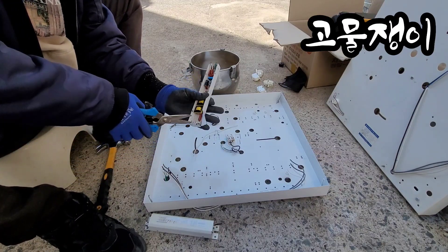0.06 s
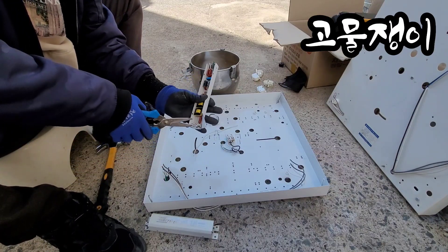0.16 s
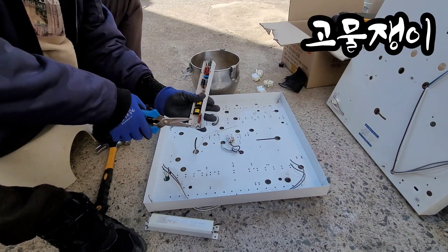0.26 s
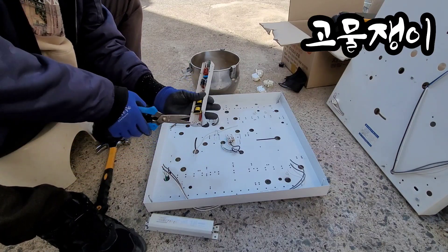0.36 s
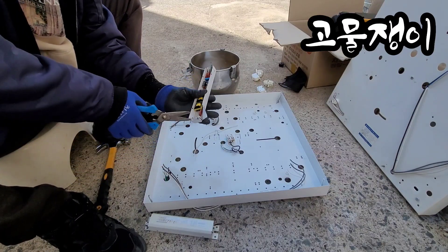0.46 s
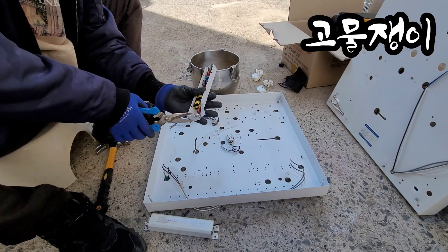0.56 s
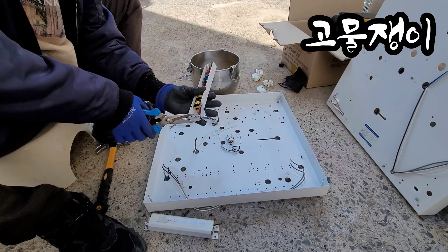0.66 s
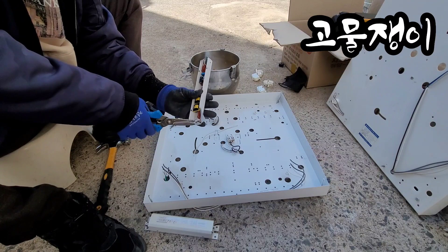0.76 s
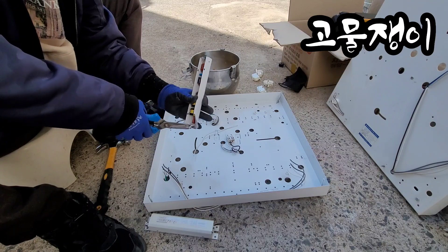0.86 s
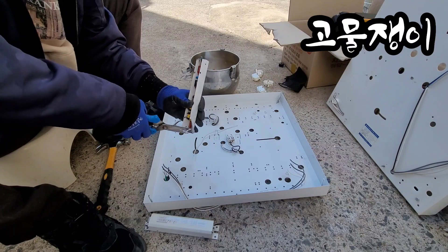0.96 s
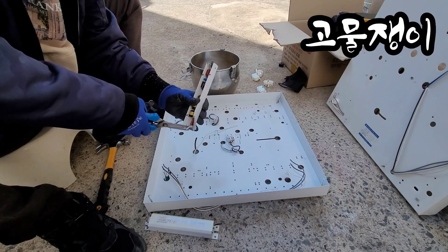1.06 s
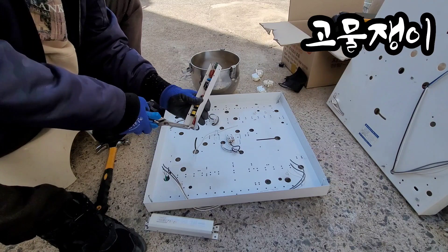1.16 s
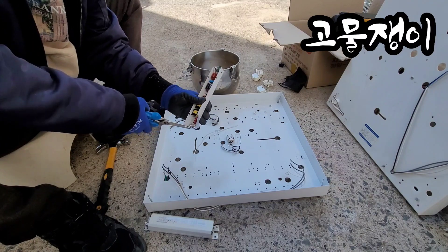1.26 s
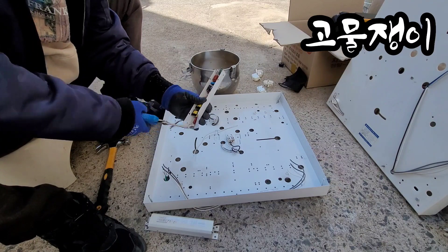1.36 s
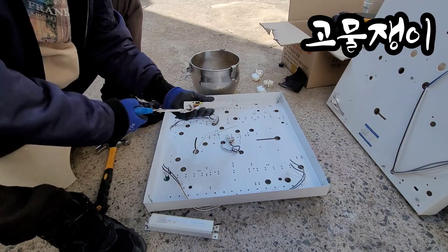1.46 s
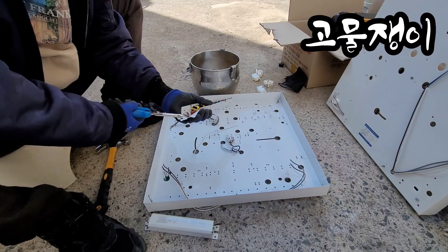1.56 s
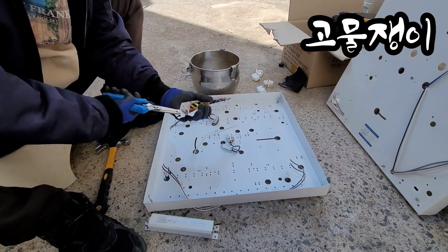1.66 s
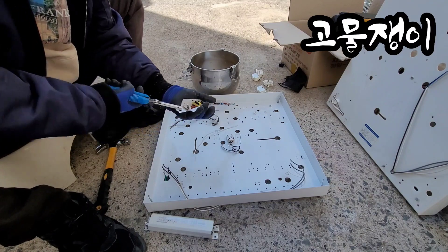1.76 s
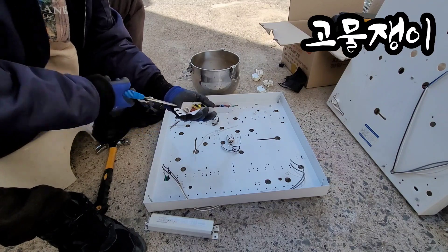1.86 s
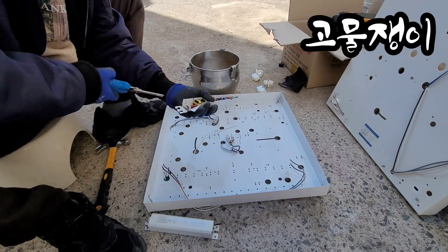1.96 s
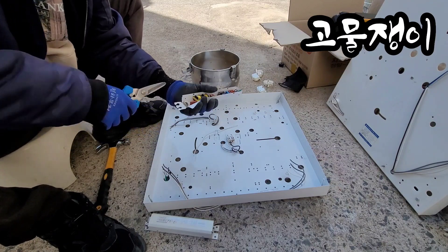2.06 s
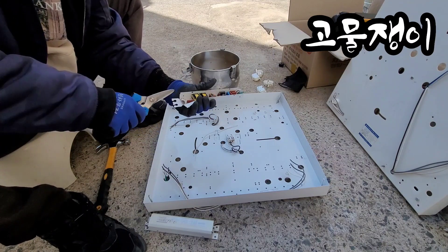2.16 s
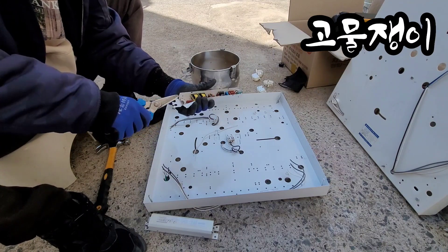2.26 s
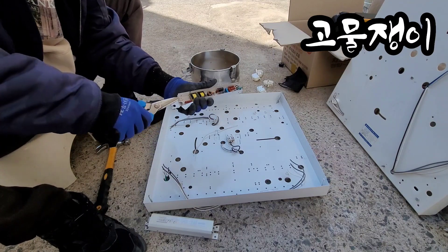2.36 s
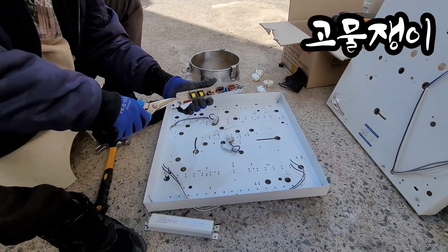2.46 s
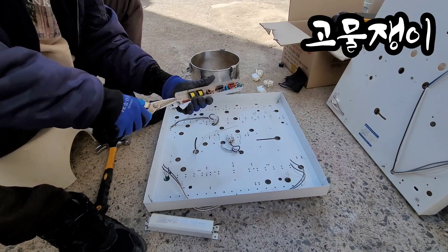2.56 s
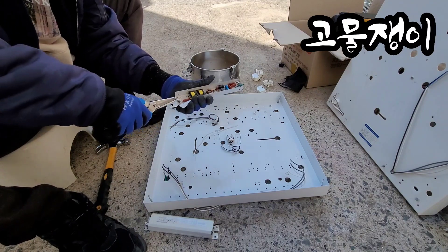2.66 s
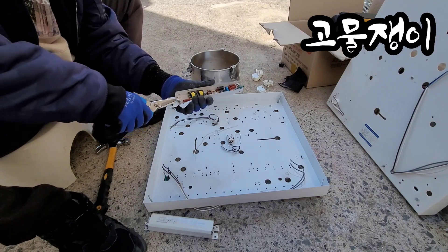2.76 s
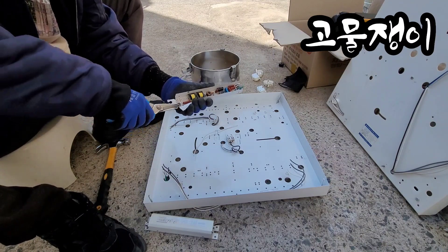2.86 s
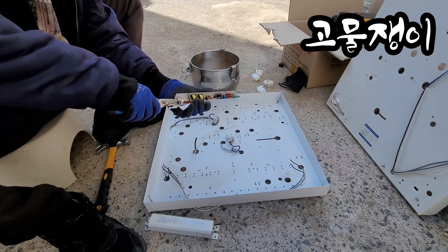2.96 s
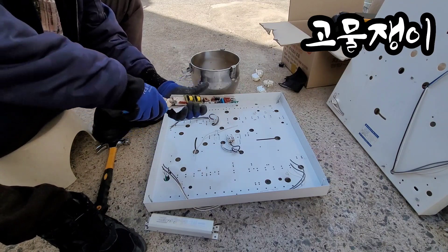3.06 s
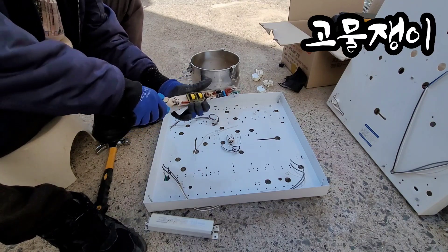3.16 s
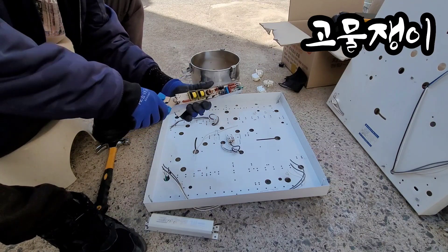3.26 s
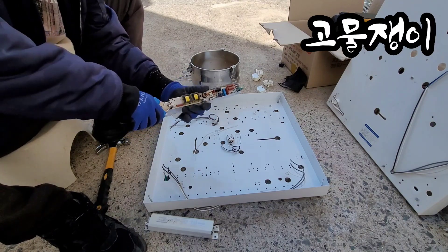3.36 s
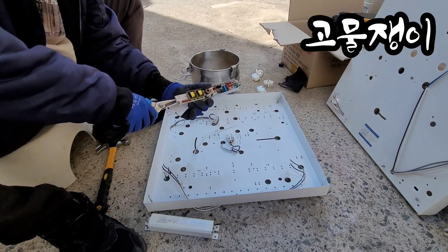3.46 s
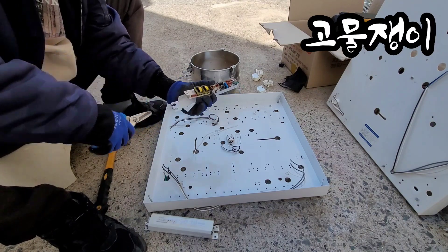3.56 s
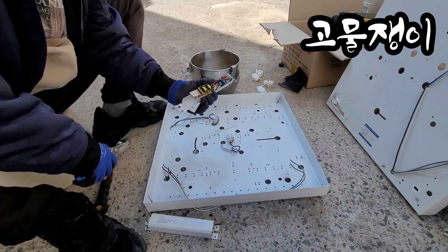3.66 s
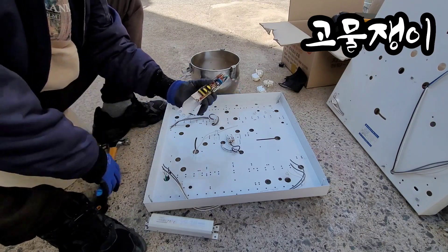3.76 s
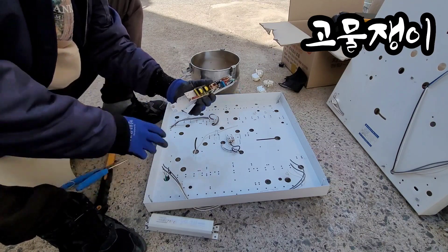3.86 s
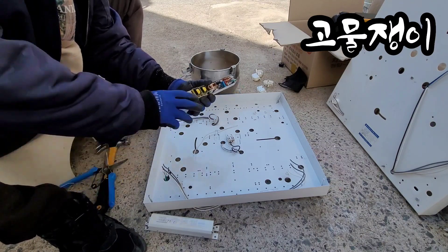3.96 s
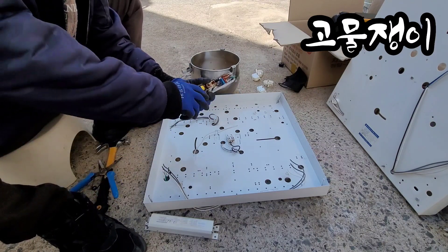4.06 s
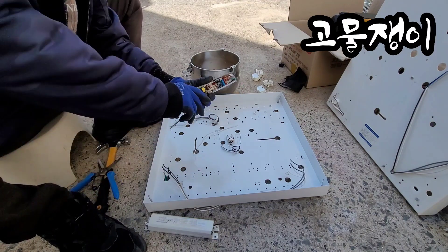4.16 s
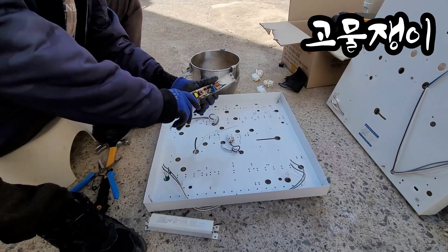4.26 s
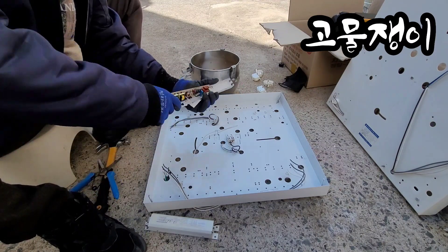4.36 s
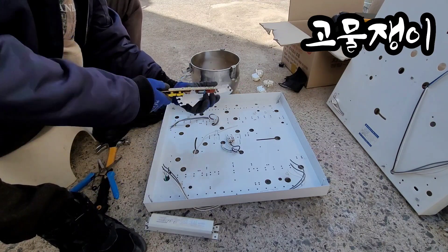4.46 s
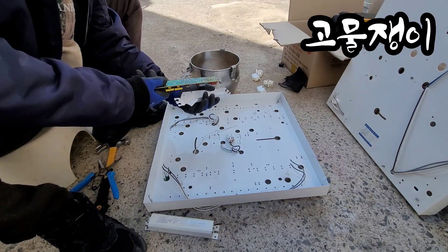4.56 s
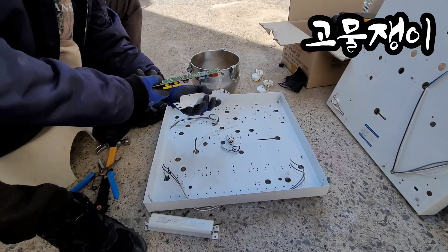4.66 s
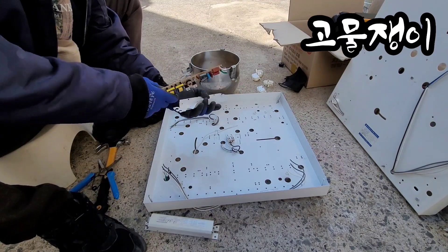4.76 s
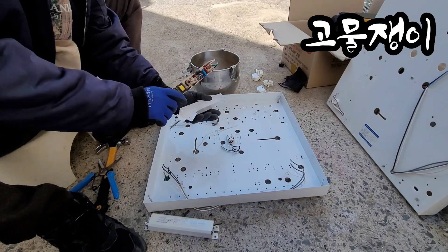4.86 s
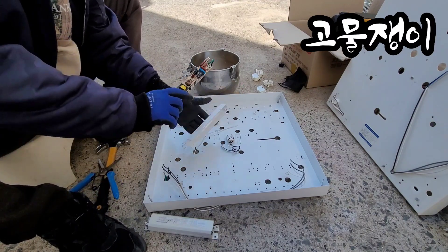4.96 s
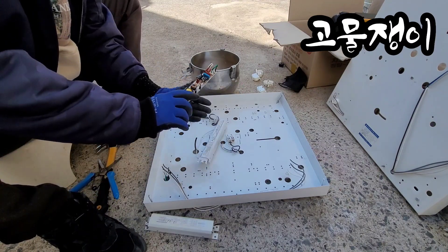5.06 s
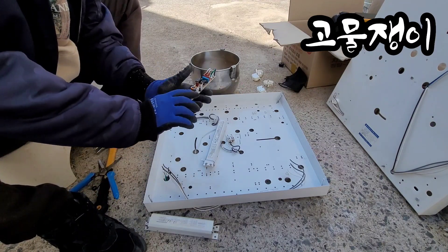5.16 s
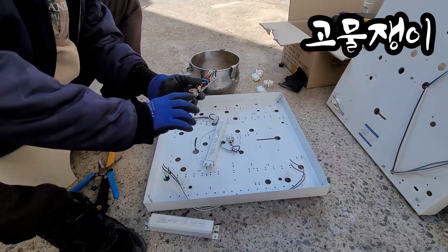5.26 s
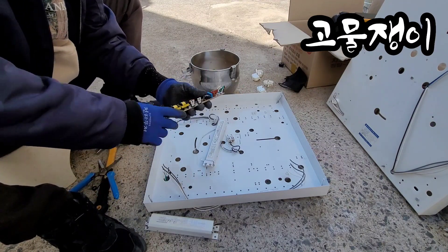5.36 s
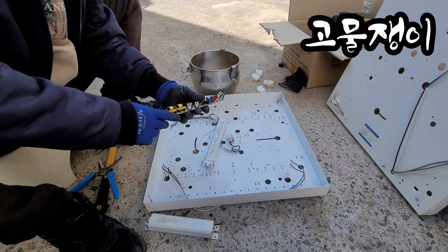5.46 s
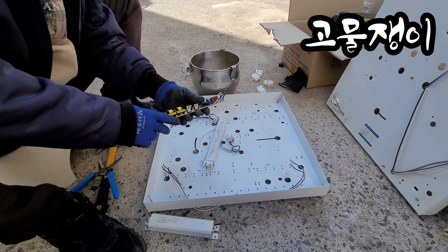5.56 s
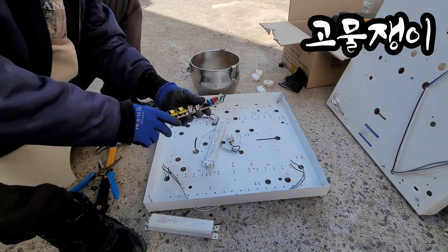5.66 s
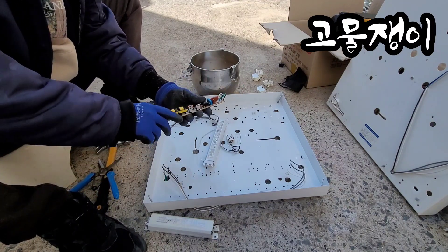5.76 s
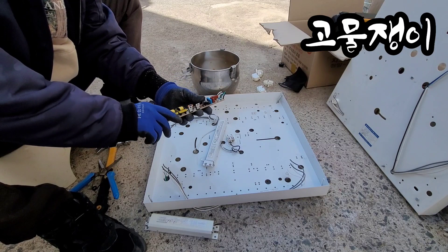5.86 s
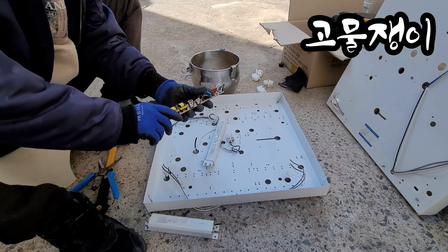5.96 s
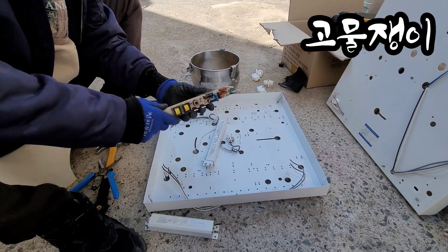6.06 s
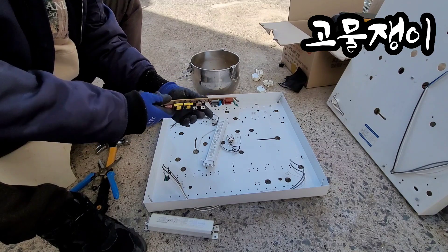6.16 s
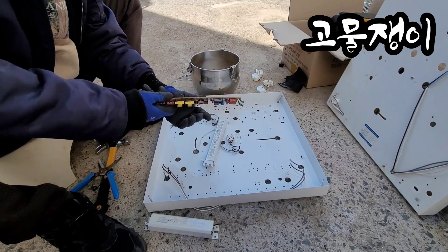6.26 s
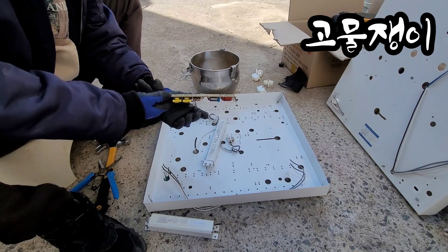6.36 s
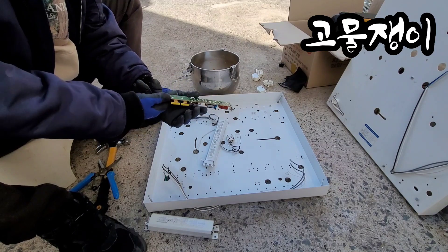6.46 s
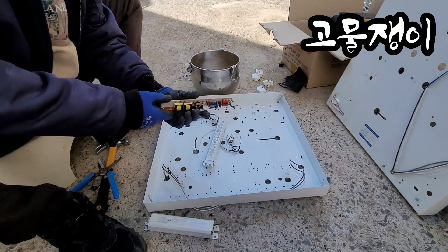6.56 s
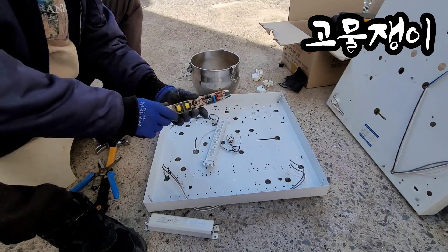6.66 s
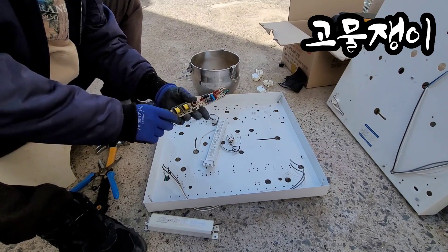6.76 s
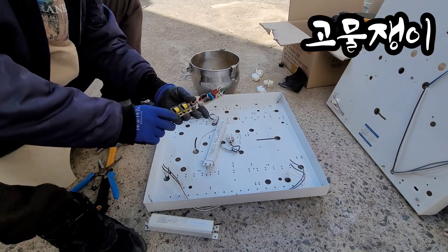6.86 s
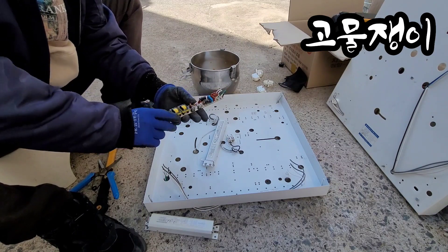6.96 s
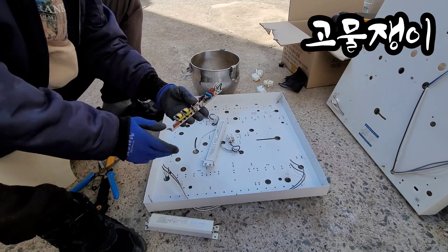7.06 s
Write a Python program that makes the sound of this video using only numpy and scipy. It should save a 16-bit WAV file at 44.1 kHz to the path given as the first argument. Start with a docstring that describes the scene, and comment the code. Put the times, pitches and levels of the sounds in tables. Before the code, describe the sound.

Close stereo sound of gloved hands taking apart a light fixture on outdoor concrete. Distant traffic rumbles softly with a faint low engine drone. From 0 to 1.3 seconds there are sparse, light board ticks and small steel clicks. At about 1.6 the cutters bite and snap sharply through a wire, with a brief steely ring. Clicks at 2.0 and 2.3 lead to denser prying taps, scrapes and tiny rubber squeaks from 2.9 to 3.5. Three quick steel clicks come near 3.7. From 3.9 to 4.3 the cutters go down on grit: bright cracks, two clacks and short ringing thuds, followed by a small scrape, squeak and taps around 4.4. At 5.05 a cover comes loose faintly, then from 5.2 it bounces rapidly in the sheet-metal tray, a loud bright crash settling by 5.5 with ringing that fades by about 6. Quiet background and barely audible clicks remain until 7.1.

```python
"""Cutting a wire on concrete

Outdoors, close to two microphones, gloved hands work on a light fixture's circuit board with wire cutters.
The board ticks (noise bursts through resonances), gloves squeak (rough tones), steel scrapes (grains of noise).
The cutters snap through once, pry, and are put down on gritty ground: cracks, a clack and a ringing thud.
Then the board's plastic cover bounces in the sheet-metal tray, setting clear and dense modes ringing.
Ground and walls throw the work back; far off, traffic rumbles (filtered noise) and an engine drones (a sine)."""
import sys
import numpy as np
from scipy import signal
from scipy.fft import rfft, irfft
from scipy.io import wavfile
from scipy.ndimage import uniform_filter1d

SR = 44100
rng = np.random.default_rng(int(sys.argv[2]) if len(sys.argv) > 2 else 0)


def generate_wav(sig):
    """Save sig (samples, or channels by samples) to the path in sys.argv[1] as 16-bit PCM at SR."""
    pcm = np.round(np.clip(np.atleast_2d(sig).T, -1, 1) * 32767).astype(np.int16)
    wavfile.write(sys.argv[1], SR, pcm)


N = 314424


def amp(db):
    """Decibels to gain."""
    return 10 ** (np.asarray(db) / 20)


def at_hz(points, hz):
    """Read a table on a log-frequency axis."""
    points = np.array(points)
    return np.interp(np.log(hz + 1e-3), np.log(points[:, 0]), points[:, 1])


def in_time(rows):
    """Read a curve at every sample."""
    return np.interp(np.arange(N) / SR, *np.transpose(rows))


def through(x, response):
    """Play x through an impulse response, channel by channel."""
    return signal.fftconvolve(np.atleast_2d(x), np.atleast_2d(response), axes=1)[:, :N]


def coloured(x, spectrum, size=8192):
    """Causal (minimum-phase) filter with the given spectrum; white noise keeps its power."""
    cepstrum = irfft(np.log(amp(at_hz(spectrum, np.fft.rfftfreq(size, 1 / SR)))))
    # folding the cepstrum onto positive time makes the filter causal
    cepstrum[1:size // 2] *= 2
    cepstrum[size // 2 + 1:] = 0
    response = irfft(np.exp(rfft(cepstrum)))
    return through(x, response / np.linalg.norm(response))


def high_pass(x, hz, order=2):
    """Small objects radiate little bass."""
    return signal.sosfilt(signal.butter(order, hz, "high", fs=SR, output="sos"), x)


def add(track, s, sound):
    """Mix a sound into a track at time s."""
    start = max(round(s * SR), 0)
    track[:, start:start + sound.shape[-1]] += sound[..., :N - start]


def fading(t60, size):
    """Exponential decay from 1, falling 60 dB in t60 seconds."""
    return np.exp(-np.log(1000) * np.arange(size) / SR / max(t60, 1e-3))


def burst(t60, rise_s, size=8000):
    """A contact: a swarm of tiny fractures and reflections, different at each microphone."""
    noise = rng.standard_normal((2, size))
    return noise * fading(t60, size) * (1 - fading(rise_s, size))


def resonance(force, modes, size=2048):
    """Damped resonances (Hz, width Hz, dB) in parallel; white noise keeps its power."""
    t = np.arange(size) / SR
    response = np.zeros(size)
    for k, (hz, width, db) in enumerate(modes):
        sign = (-1) ** k   # neighbours ring in opposite phase
        decay = np.exp(-np.pi * width * t)
        response += sign * amp(db) * width * decay * np.cos(2 * np.pi * hz * t)
    return through(force, response / np.linalg.norm(response))


def ringing(modes, spread_db, lag_s, size=36000):
    """One blow on a set of modes, each with a fresh strength and its own lag between the microphones."""
    t, out = np.arange(size) / SR, np.zeros((2, size))
    for hz, db, t60 in modes:
        strength, late = rng.standard_normal(2)   # chance strength and direction
        lag = np.array([[0], [lag_s * (1 + late / 4)]])
        tone = np.sin(2 * np.pi * hz * np.maximum(t - lag, 0))
        out += amp(db + spread_db * strength) * fading(t60, size) * tone
    return out


def dense_ring(t60s, size=36000, count=10):
    """Countless overlapping modes: noise that dies band by band; unit energy."""
    out, edges = 0, np.geomspace(100, 18000, count)
    for low, high in zip(edges, edges[1:]):
        band_pass = signal.butter(2, [low, high], "band", fs=SR, output="sos")
        band = signal.sosfilt(band_pass, rng.standard_normal((2, size)))
        out = out + band * fading(at_hz(t60s, np.sqrt(low * high)), size)
    return out / np.sqrt(np.sum(out ** 2) / 2)


# spectrum of the far traffic: f/Hz, relative level/dB
STREET_SPECTRUM = [(15, -29.5), (25, -15.5), (50, -2.5), (88, 0.5), (125, -4), (170, -12.5), (240, -23),
                   (400, -26.5), (680, -27), (800, -30.5), (1200, -43), (2000, -40.5), (4000, -53)]
# swell of the far rumble, before the trims of its two parts: t/s, level/dB
TRAFFIC_SWELL = [(0, -43.5), (.8, -45.5), (1.5, -50.5), (2.5, -51.5), (3.0, -46.5), (4.1, -46.5),
                 (4.6, -50), (5.15, -49.5), (5.6, -53.5), (7.13, -54)]


def street(rumble_db=-1, hush_db=5.0, follow=0.6, split_hz=190, wide_hz=800):
    """Far traffic: a swelling rumble nearly alike on both sides, and a wider hush that follows it in part."""
    mid, side = coloured(rng.standard_normal((2, N)), STREET_SPECTRUM)
    width = high_pass(side, wide_hz, order=1) + .1 * side
    noise = mid + width * np.array([[1], [-1]])
    low = signal.sosfiltfilt(signal.butter(2, split_hz, fs=SR, output="sos"), noise)
    swell = in_time(TRAFFIC_SWELL)
    hush = swell.mean() + follow * (swell - swell.mean())
    return amp(swell + rumble_db) * low + amp(hush + hush_db) * (noise - low)


# a distant engine: t/s, peak level/dB
ENGINE_LEVEL = [(0, -45.5), (.8, -47.5), (1.4, -61.5), (3.4, -60.5), (4.2, -57.5), (5.0, -49), (5.4, -60),
                (7.13, -67)]


def engine(hz=86, waver=0.038):
    """A low drone whose speed wanders (waver: rms share of its pitch), alike on both sides."""
    wander = uniform_filter1d(rng.standard_normal(N), size=9000)
    speed_hz = hz * (1 + waver * wander / wander.std())
    phase = 2 * np.pi * np.cumsum(speed_hz) / SR
    return amp(in_time(ENGINE_LEVEL)) * np.sin(phase)


# spectrum of the microphone hiss: f/Hz, relative level/dB
HISS_SPECTRUM = [(500, 0), (1500, 0), (3000, -6), (6000, -14), (9000, -16), (16000, -18)]


def microphone_hiss(level_db=-72):
    """Steady noise of the microphones, independent in each."""
    return amp(level_db) * coloured(rng.standard_normal((2, N)), HISS_SPECTRUM)


# resonances of the board in the glove: f/Hz, width/Hz, relative level/dB
BOARD_MODES = [(1620, 284, -5), (2000, 43, -3), (2331, 156, 2.5), (2800, 230, -0.5), (3030, 306, 0),
               (3830, 690, -6), (5430, 690, -12)]
# spectrum of a bright crack: f/Hz, relative level/dB
CRACK_SPECTRUM = [(300, -19), (900, -2), (2000, -21), (4000, -2), (5600, -6), (7500, -1), (10000, -4.5),
                  (16000, -6.5)]
TOUCH_RISE_S = .007   # a contact's build-up comes within 60 dB of complete in this time
RING_WIDTH_SHARE = .11   # width of the touched part's resonance, as a share of its pitch


def contacts(rows, body_db, crack_db, ring_db, left_db, low_cut_hz=600):
    """Each small contact knocks the board, gives a bright crack and rings the touched part."""
    body, crack, part = np.zeros((3, 2, N))
    for s, db, hz, t60 in rows:
        add(body, s, amp(db + body_db) * burst(t60, TOUCH_RISE_S))
        add(crack, s, amp(db + crack_db) * burst(t60 * 0.81, TOUCH_RISE_S))
        ring = resonance(burst(t60 / 2, TOUCH_RISE_S), [(hz, hz * RING_WIDTH_SHARE, 0)])
        add(part, s, amp(db + ring_db) * ring)
    dull = high_pass(resonance(body, BOARD_MODES) + part, low_cut_hz)
    sound = dull + coloured(crack, CRACK_SPECTRUM)
    return sound * amp([[left_db / 2], [-left_db / 2]])


# The three tables of contacts: t/s, relative level/dB, ring f/Hz, t60/s of the knock
# (the crack and the force on the ringing part die sooner).
# jaws and fingers tap the board
TAP_ROWS = [(0.1983, -33.5, 2120, 0.027), (0.3162, -46, 2260, 0.02), (0.5422, -39.5, 2760, 0.037),
            (0.886, -48, 2250, 0.071), (1.0651, -35, 2380, 0.047), (1.1159, -48.5, 2380, 0.031),
            (1.2, -47, 1890, 0.045), (1.2375, -49, 2760, 0.05), (1.2935, -50, 2310, 0.021),
            (1.7524, -48.5, 2580, .12), (2.3269, -40, 2370, .04), (2.6572, -39, 1843, .025),
            (2.7576, -47, 2280, 0.085), (2.876, -34, 2150, .022), (3.0848, -35.5, 2180, 0.033),
            (3.1635, -26, 2150, 0.043), (3.2214, -34.5, 3330, 0.044), (3.2564, -31.5, 2000, 0.018),
            (3.343, -43.5, 1690, 0.081), (3.4168, -23, 2340, 0.051), (3.4436, -27, 2000, 0.025),
            (4.4102, -33, 2470, 0.028), (4.4907, -33.5, 2410, 0.053)]
# bright clicks of steel on steel and on wire
CLICK_ROWS = [(0.184, -42, 3400, .05), (0.7652, -37, 8100, 0.027), (2.022, -37, 3180, 0.052),
              (2.2586, -28, 6300, 0.016), (3.6642, -25.5, 5230, 0.031), (3.676, -26.5, 5300, 0.057),
              (3.6902, -24, 5500, 0.037), (6.2174, -58.5, 8500, 0.043), (6.7705, -50, 6300, .09)]
# grit cracks on the concrete around the cutters
GRIT_ROWS = [(3.934, -17, 10000, 0.04), (3.983, -32, 2460, 0.023), (4.0277, -31.5, 1400, 0.12),
             (4.0855, -22, 1850, 0.046), (4.129, -33, 1930, 0.047), (4.166, -25.5, 3670, 0.032),
             (4.1863, -29.5, 11200, 0.041), (4.2192, -35, 8500, 0.052), (4.2488, -41, 10700, 0.043),
             (4.2645, -19, 9800, 0.027), (4.3163, -47, 8540, 0.035)]


def ticks():
    """Taps are mostly board, jaw clicks mostly ringing steel, grit mostly crack."""
    taps = contacts(TAP_ROWS, body_db=-1.5, crack_db=-7.5, ring_db=1.5, left_db=3.0)
    clicks = contacts(CLICK_ROWS, body_db=-4.5, crack_db=-.5, ring_db=3.5, left_db=3.0)
    grit = contacts(GRIT_ROWS, body_db=-14, crack_db=-1.0, ring_db=-1.5, left_db=2.5)
    return taps + clicks + grit


# rubber gloves squeak on the board: t/s of the middle, f/Hz, level/dB before the
# left and right trims, length/s between the points where the swell is at 1/e
SQUEAK_ROWS = [(1.062, 2365, -48, 0.013), (2.943, 2270, -47.5, 0.0087), (3.002, 2212, -46, .043),
               (3.026, 2250, -36, 0.011), (3.156, 3330, -42, .02), (3.257, 2020, -45.5, .027),
               (3.31, 2400, -48.5, .028), (3.463, 2030, -38.5, .034), (4.413, 2470, -33.5, .0086)]


def squeaks(jitter=0.033, left_db=1.5, right_db=-4, size=8820):
    """Rubber sticks and slips at a nearly steady rate: short, slightly rough tones."""
    out, t = np.zeros((2, N)), (np.arange(size) - size // 2) / SR
    for s, hz, db, length in SQUEAK_ROWS:
        waver = uniform_filter1d(rng.standard_normal(size), size=70)
        slip_hz = hz * (1 + jitter * waver / waver.std())
        phase = 2 * np.pi * np.cumsum(slip_hz) / SR
        tone = np.sin(phase + rng.uniform(-1, 1, (2, 1)))   # own phase at each microphone
        swell = np.exp(-(2 * t / length) ** 2)
        add(out, s + t[0], np.sqrt(2) * amp(db) * swell * tone)
    return out * amp([[left_db], [right_db]])


# the jaws bite, then snap shut through the wire, a much fainter sound just before the
# snap: t/s, relative level/dB, t60/s
SNIP_ROWS = [(1.568, -12, 0.016), (1.5778, -27.5, .04), (1.5847, -5, 0.02)]
# spectrum of the snip's crack: f/Hz, relative level/dB
SNIP_SPECTRUM = [(200, -34), (450, -16), (820, -20.5), (1200, -8.5), (1450, -14), (1680, -5), (2050, -7),
                 (2400, 2), (3100, -2.5), (5000, -6.5), (6600, -5), (10300, -16.5), (14500, -12),
                 (16000, -15.5)]


def snip(ring_hz=1661, ring_db=-16, ring_t60=0.07, high_ring_hz=3690, high_ring_db=-19,
         knock_hz=600, knock_width_hz=400, knock_db=-11):
    """The jaws snap shut through the wire: a crack, a knock through the board, a brief ring of steel."""
    force, steel = np.zeros((2, 2, N))
    steel_modes = [(ring_hz, ring_db, ring_t60), (high_ring_hz, high_ring_db, ring_t60)]
    for s, db, t60 in SNIP_ROWS:
        add(force, s, amp(db) * burst(t60, rise_s=.006))
        add(steel, s, amp(db) * ringing(steel_modes, spread_db=1, lag_s=.0001))
    board = resonance(force, [(knock_hz, knock_width_hz, 0)])
    knock = amp(knock_db) * high_pass(board, 480, order=4)
    return coloured(force, SNIP_SPECTRUM) + knock + steel


def grains(per_s, spread_db):
    """Random slips of uneven size, each a very short burst; rms 1."""
    size_db = spread_db * np.minimum(rng.exponential(1, N), 3)
    slips = (rng.random(N) < per_s / SR) * amp(size_db)
    power = np.maximum(through(slips ** 2, fading(.008, size=600)), 0)
    return rng.standard_normal((2, N)) * np.sqrt(power / power.mean())


# strokes of the jaws over board and grit: t/s of greatest pressure, level/dB, time/s to swell by 20 dB
STROKE_ROWS = [(3.165, -36.5, 0.1676), (3.415, -50.5, .1), (3.8, -60, .15), (4.045, -41, .1),
               (4.38, -42.5, .045)]
# spectrum of the scraping: f/Hz, relative level/dB
SCRAPE_SPECTRUM = [(250, -22.5), (500, -9), (1100, -17.5), (1600, -11), (2300, -16), (2850, -6.5),
                   (3280, -6.5), (4150, -14), (6000, -16.5), (16000, -22.5)]
RELEASE_DB_PER_S = 169.5   # every stroke eases off alike


def friction(left_db=0.16):
    """Steel scrapes over the board and over grit; in each stroke the pressure swells and eases off."""
    slips = grains(per_s=800, spread_db=4.2)
    t, pressure = np.arange(N) / SR, np.zeros(N)
    for s, db, swell_s in STROKE_ROWS:
        below_peak_db = np.maximum(20 * (s - t) / swell_s, RELEASE_DB_PER_S * (t - s))
        pressure += amp(db - below_peak_db)
    return coloured(pressure * slips, SCRAPE_SPECTRUM) * amp([[left_db], [-left_db]])


# the cutters land on their handles: t/s, relative level/dB
KNOCK_ROWS = [(4.0036, -0.5), (4.0685, -2.5)]
# low thud and short ring of the handles: f/Hz, relative level/dB, t60/s
THUD_MODES = [(351.4, -22.5, 0.22), (413, -10, 0.085), (482.5, -6, 0.12), (503, -4, 0.025),
              (586, -30, 0.075), (715, -12, 0.06), (930, -16.5, .05), (1420, -24, .08), (1650, -25, .08)]
# spectrum of the clack: f/Hz, relative level/dB
CLACK_SPECTRUM = [(200, -17), (600, 7.5), (1100, -16.5), (1800, -1), (2500, -1.5), (3400, -9), (4500, -19),
                  (9000, -20.5), (16000, -24)]


def cutters_down(clack_db=-11, thud_delay_s=0.00031):
    """A hard clack, then the thud of the coated handles builds up."""
    clack, thud = np.zeros((2, 2, N))
    swell = 1 - fading(.012, size=36000)
    for s, db in KNOCK_ROWS:
        add(clack, s, amp(db + clack_db) * burst(t60=0.065, rise_s=0.0032))
        handles = swell * ringing(THUD_MODES, spread_db=1, lag_s=.0005)
        add(thud, s + thud_delay_s, amp(db) * handles)
    return high_pass(coloured(clack, CLACK_SPECTRUM) + thud, 310, order=6)


# the cover rocks to rest, each touch weaker
SETTLE_S, SETTLE_DB, SETTLE_GAP_S, SETTLE_LOSS_DB = 5.359, -19.5, 0.024, 6.5


def settling(count=5):
    """The last light touches of the cover: rows of (s, dB)."""
    return [(SETTLE_S + k * SETTLE_GAP_S, SETTLE_DB - k * SETTLE_LOSS_DB) for k in range(count)]


# decay of the tray's dense modes: f/Hz, t60/s
TRAY_DECAY = [(150, 0.68), (600, 0.64), (1500, 0.56), (2600, .42), (4000, 0.37), (15000, 0.31)]


def sheet(count=380):
    """Ring of a thin plate, whose modes lie evenly scattered in frequency; unit energy."""
    hz = rng.uniform(1550, 16000, count)
    modes = np.transpose([hz, 0 * hz, at_hz(TRAY_DECAY, hz)])
    ring = ringing(modes, spread_db=2, lag_s=.0004, size=24000)
    ring = ring * (1 - fading(.01, size=24000))   # the modes build up as the wave crosses the sheet
    return ring / np.sqrt(np.sum(ring ** 2) / 2)


# the cover comes unclipped and rings faintly: f/Hz, level/dB, t60/s
UNCLIP_MODES = [(2100, -68, .4), (2800, -63, .15), (3770, -60, .25)]
UNCLIP_S = 5.05
# the cover bounces in the tray: t/s, relative level/dB
BOUNCE_ROWS = [(5.1665, -14.5), (5.177, 2), (5.189, -.5), (5.2015, 1.5), (5.215, -3), (5.2485, -3.5),
               (5.297, -4.5), (5.315, -8)]
# clear modes of the tray: f/Hz, relative level/dB, t60/s before the cover damps them
TRAY_MODES = [(219.4, -14.5, .6), (345, -21.5, 0.39), (393, -10, .4), (489.4, -8, .8), (1270, 1.5, 0.46),
              (1303, -6, 0.6), (1340, -3.5, 0.24), (1360, -5, 0.41), (1430, -1.5, 0.19), (1645, 3.5, 0.45),
              (1875, -4, 0.55), (2090, -6.5, 0.95), (2320, -10, .5), (2380, 5.5, 0.41), (2420, -7, 0.36),
              (2700, -3.5, 0.39), (2953, -3, .4), (4132, -10, .35), (4773, -10.5, .3), (5460, -4.5, 0.18),
              (7000, -13.5, .3), (8200, -7.5, 0.37), (8600, -0.5, .28)]
# spectrum of crash and dense ring: f/Hz, relative level/dB
TRAY_SPECTRUM = [(110, -26.5), (185, -7.5), (300, -15), (480, -3), (620, -11.5), (980, -14.5), (1350, 2.5),
                 (1800, -9.5), (2450, -6.5), (3600, -11.5), (5300, -10.5), (6400, -14), (13500, -13.5),
                 (16000, -17.5)]


def cover_drop(crash_db=-9, wash_db=8, sheet_db=9, modes_db=-31.5, damping=0.82):
    """The cover comes loose; each bounce gives a short crash and rings the tray's clear and dense modes."""
    crash, wash, blows, modes = np.zeros((4, 2, N))
    add(modes, UNCLIP_S, ringing(UNCLIP_MODES, spread_db=1, lag_s=.00003))
    held = fading(2.5 * damping, size=36000)   # the cover lying in the tray damps it
    for s, db in list(BOUNCE_ROWS) + settling():
        add(crash, s, amp(db + crash_db) * burst(t60=.06, rise_s=.005))
        add(wash, s, amp(db + wash_db) * dense_ring(TRAY_DECAY))
        add(blows, s, amp(db + sheet_db) * np.ones(1))
        clear = held * ringing(TRAY_MODES, spread_db=1.5, lag_s=.0004)
        add(modes, s + rng.uniform(0, .001), amp(db + modes_db) * clear)
    dense = crash + wash + through(blows, sheet())
    return high_pass(coloured(dense, TRAY_SPECTRUM) + modes, 110)


# spectrum of the sound thrown back: f/Hz, relative level/dB
YARD_SPECTRUM = [(100, -13.5), (500, -11), (1500, -5.5), (4000, 3), (8000, -1), (16000, -4.5)]
# decay of the sound thrown back: f/Hz, t60/s
YARD_DECAY = [(150, 0.92), (2000, 0.2), (6000, 0.23), (15000, 0.15)]


def yard(sent):
    """The ground and nearby walls throw sound back as a dense tail that dies band by band."""
    return coloured(through(sent, dense_ring(YARD_DECAY)), YARD_SPECTRUM)


def bass_alike(x, below_hz=210):
    """Long waves reach both microphones alike."""
    side = (x - x[::-1]) / 2
    return x - signal.sosfiltfilt(signal.butter(3, below_hz, fs=SR, output="sos"), side)


def scene(yard_db=-12, ground_yard_db=-17, tray_yard_db=-14):
    """The close work and its return from the yard, over far traffic, engine and hiss."""
    hands = ticks() + squeaks() + snip() + friction()
    ground, drop = cutters_down(), cover_drop()
    sent = amp(yard_db) * hands + amp(ground_yard_db) * ground + amp(tray_yard_db) * drop
    work = bass_alike(hands + ground + drop + yard(sent))
    return work + street() + engine() + microphone_hiss()


def record(dry, cutoff_hz=16100):
    """The highest peaks are rounded and the top is cut."""
    rounded = dry / (1 + dry ** 4) ** (1 / 4)
    return signal.sosfilt(signal.ellip(10, .2, 80, cutoff_hz, fs=SR, output="sos"), rounded)


dry = scene()
out = record(dry)
generate_wav(out)
```